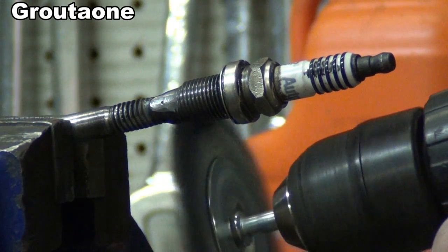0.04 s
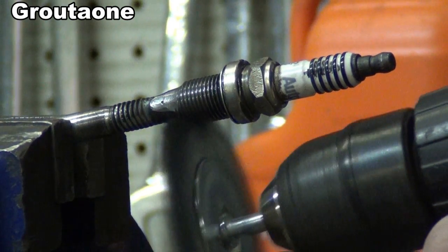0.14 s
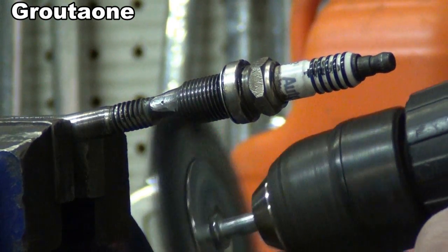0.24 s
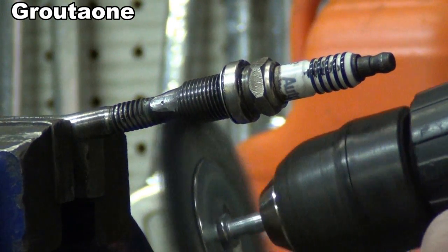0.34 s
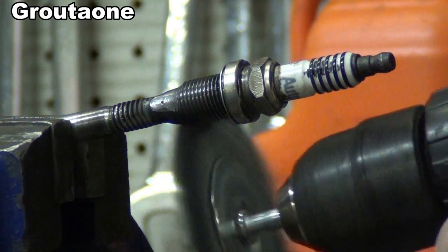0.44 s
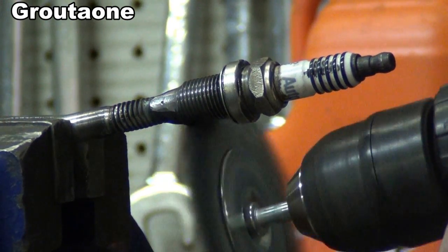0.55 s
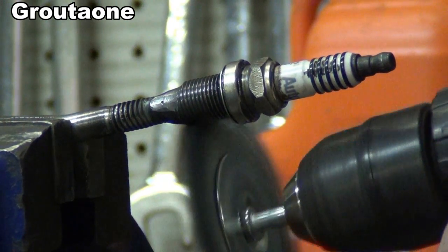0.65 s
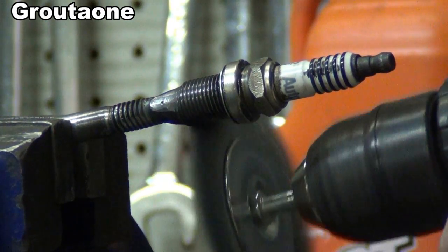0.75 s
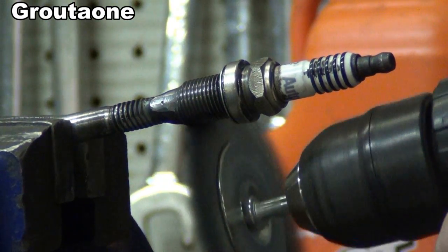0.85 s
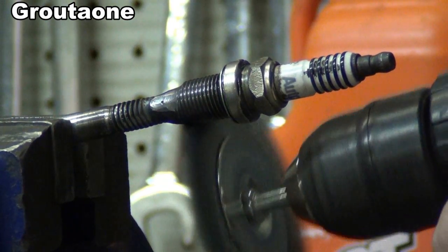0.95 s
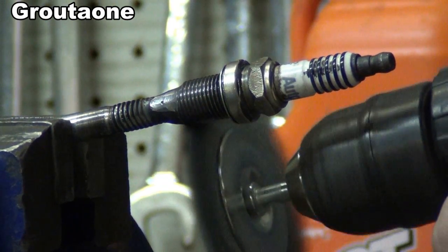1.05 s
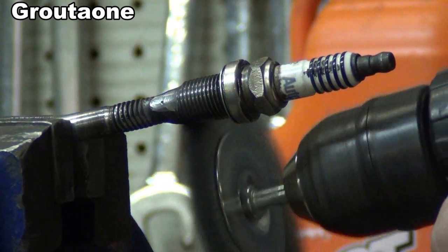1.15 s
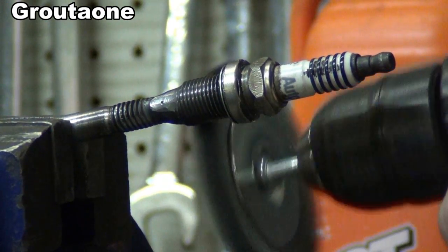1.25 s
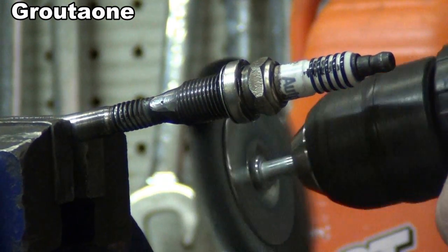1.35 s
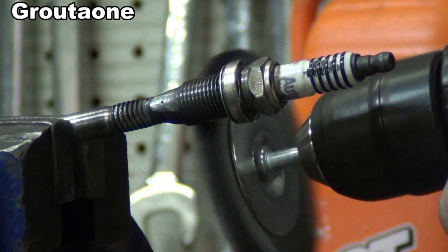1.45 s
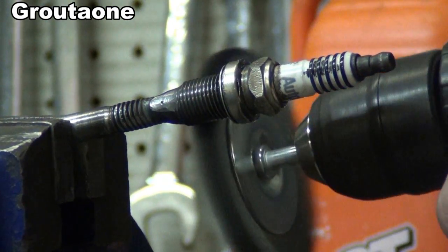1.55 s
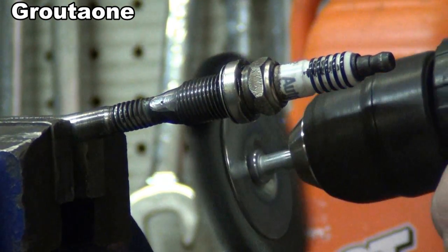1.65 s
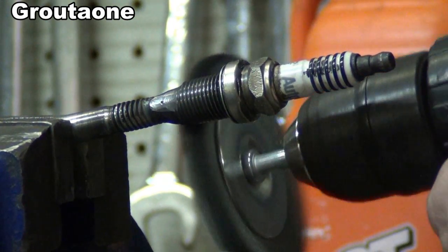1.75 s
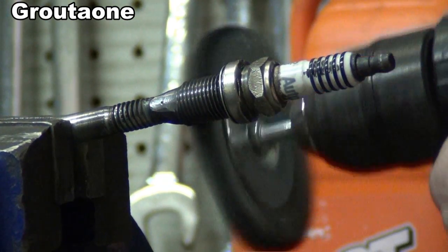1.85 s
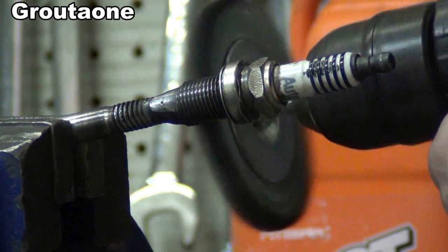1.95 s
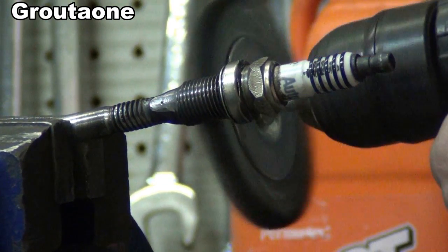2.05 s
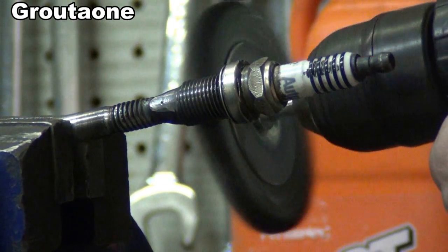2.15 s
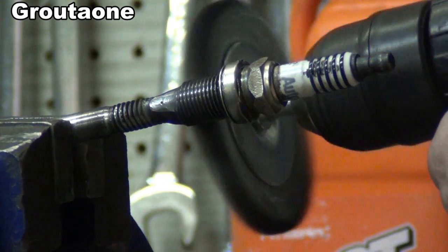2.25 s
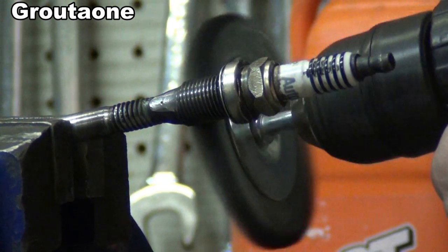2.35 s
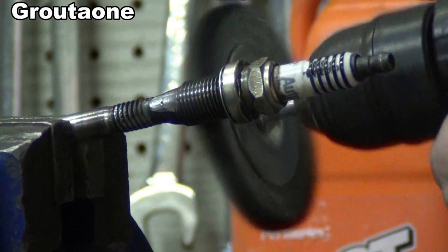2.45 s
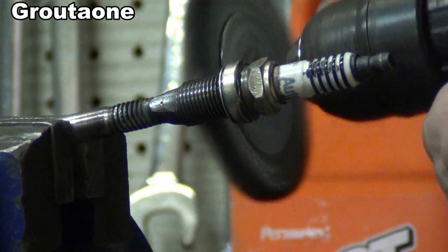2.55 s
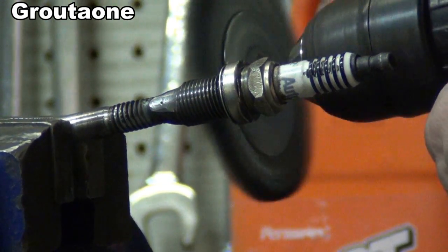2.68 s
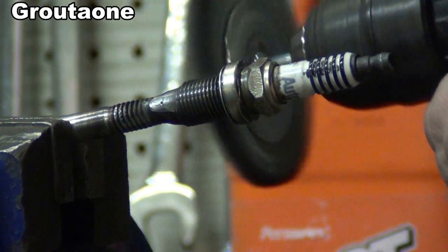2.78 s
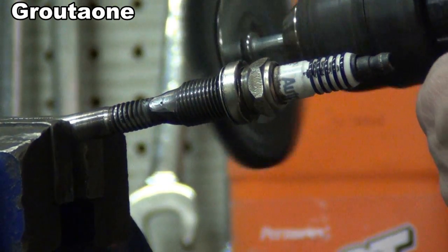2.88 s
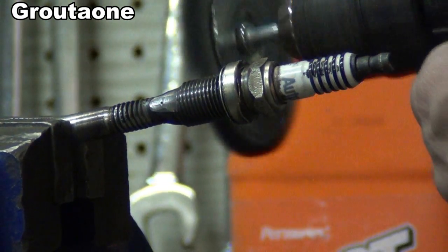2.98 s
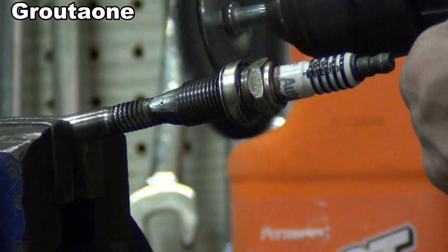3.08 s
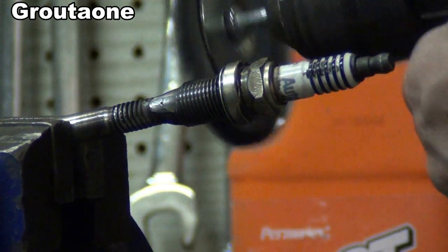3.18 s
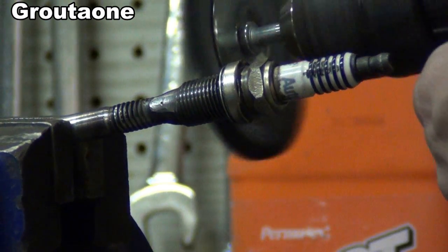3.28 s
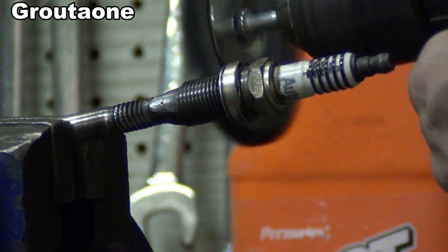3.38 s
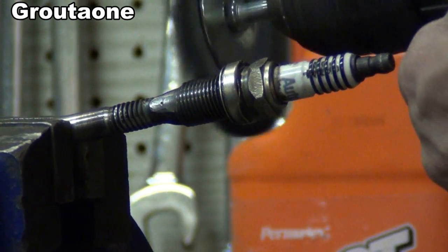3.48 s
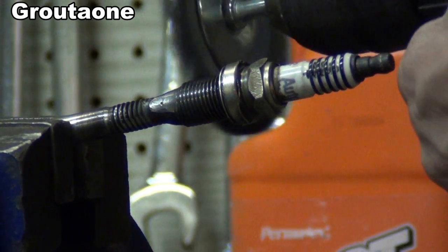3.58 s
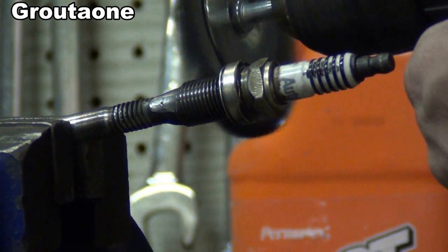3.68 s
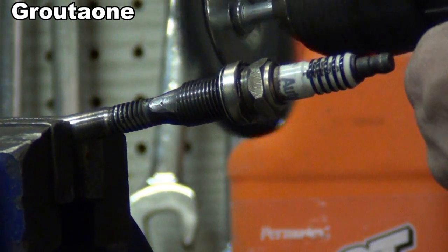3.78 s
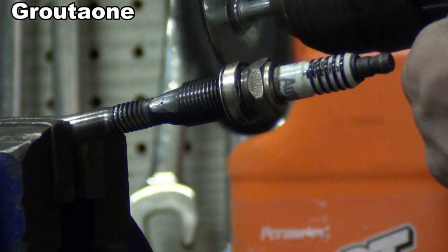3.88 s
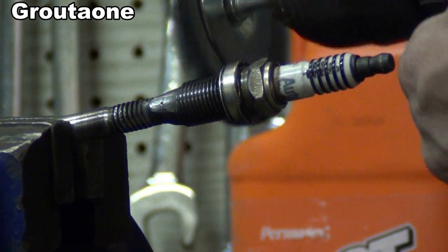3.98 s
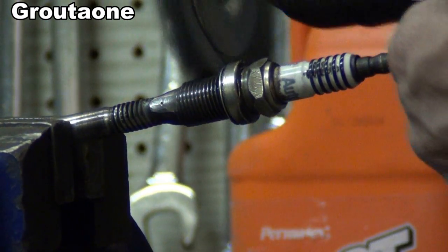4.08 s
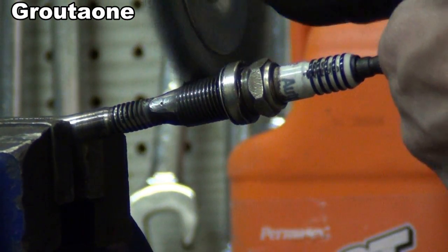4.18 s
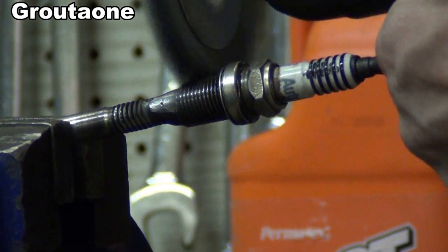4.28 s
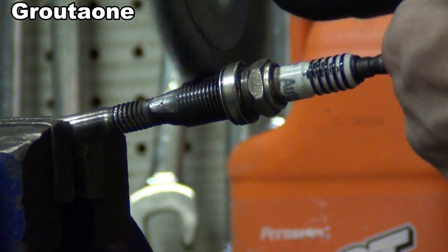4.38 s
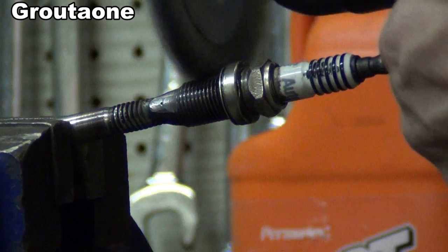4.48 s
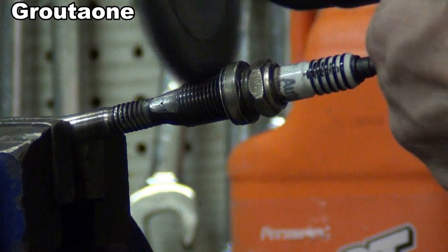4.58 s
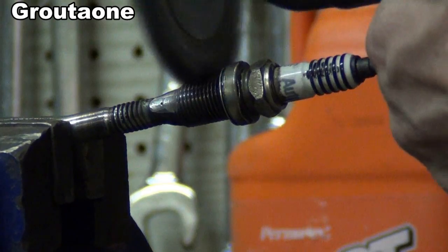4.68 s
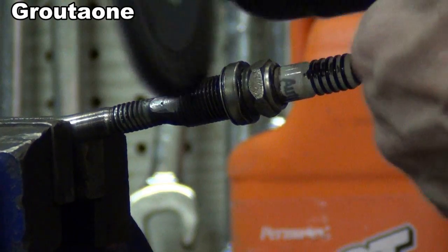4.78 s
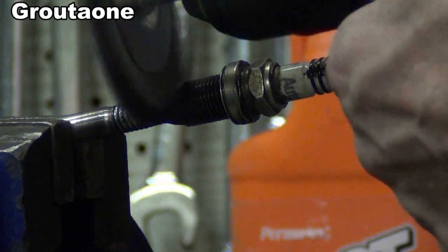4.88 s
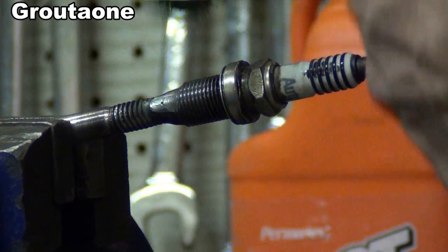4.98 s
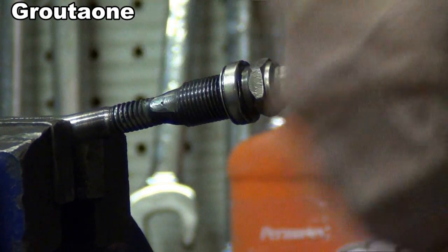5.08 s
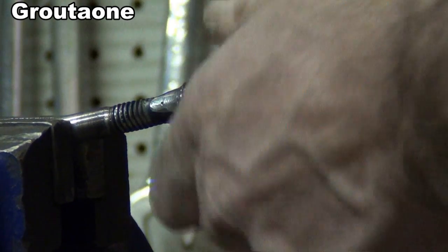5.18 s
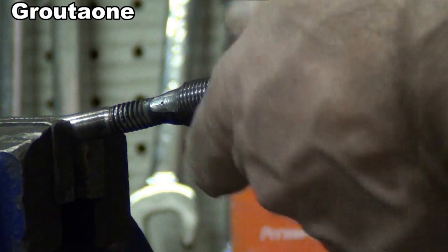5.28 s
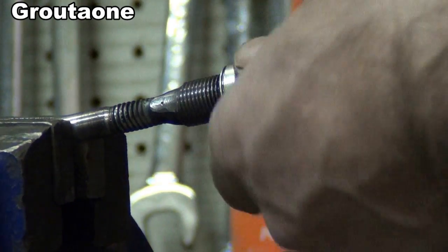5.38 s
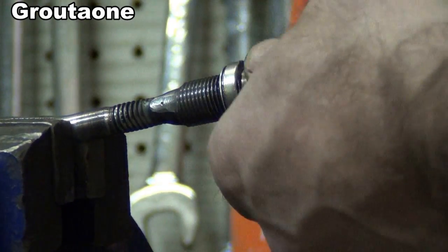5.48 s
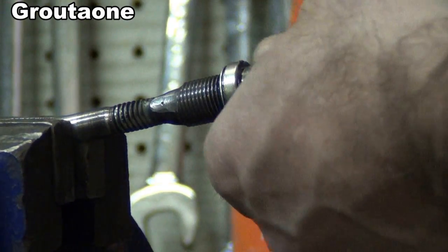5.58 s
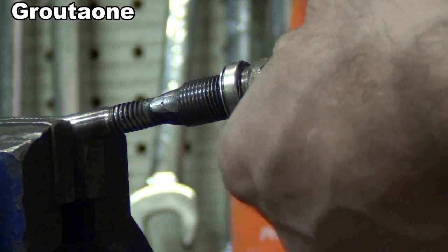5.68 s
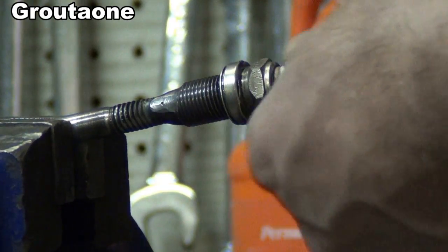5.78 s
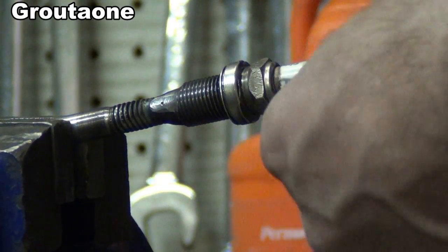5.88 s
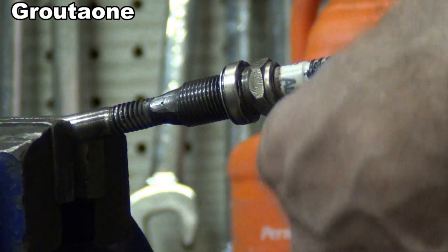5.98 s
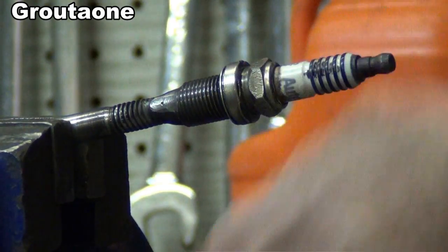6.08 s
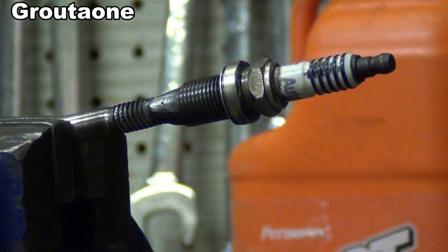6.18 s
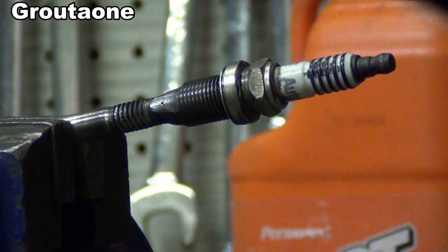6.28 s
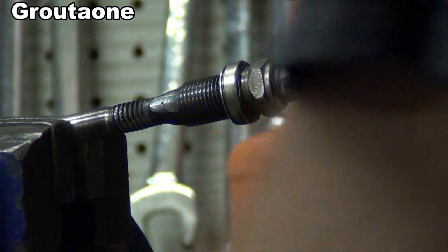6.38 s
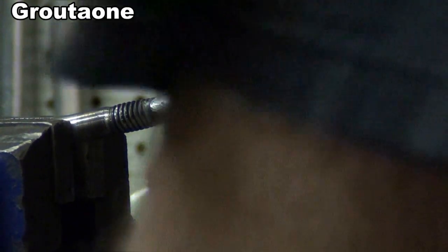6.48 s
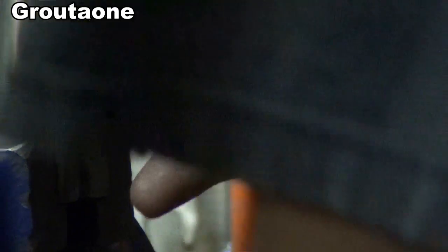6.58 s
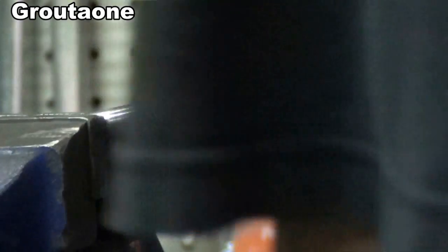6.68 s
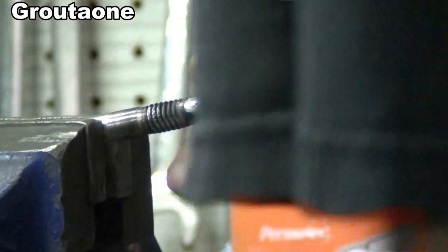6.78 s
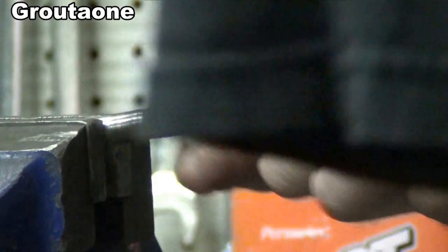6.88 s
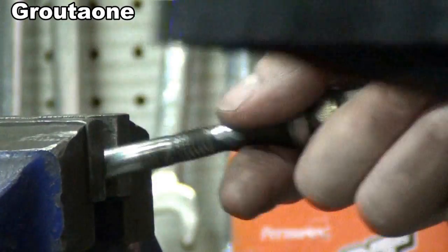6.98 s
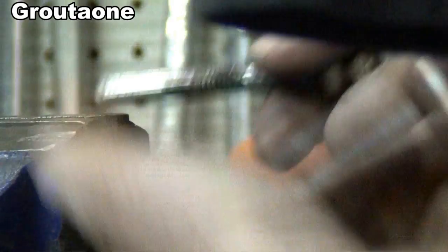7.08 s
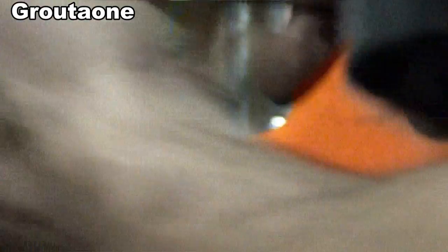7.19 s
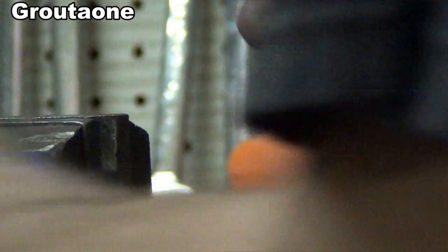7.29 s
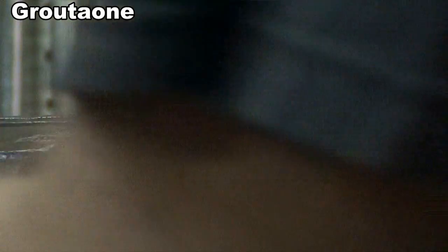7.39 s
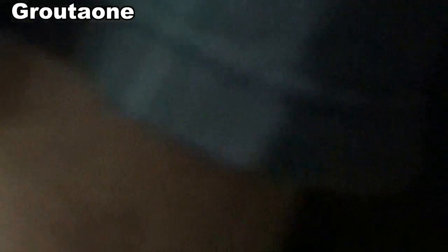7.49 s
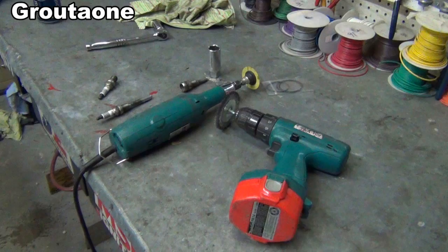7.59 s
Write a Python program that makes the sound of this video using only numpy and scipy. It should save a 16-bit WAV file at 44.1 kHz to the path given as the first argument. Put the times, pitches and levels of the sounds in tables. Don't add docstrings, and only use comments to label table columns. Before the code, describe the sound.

Near microphone, narrow stereo, short room echo. Loud continuous wire scratching and shrill drill whine fill about five seconds, pitch rising whenever pressure eases. Both stop sharply, leaving soft room hiss and faint motor ticking. Then come bouncing bench knocks, a light hand rustle, a bright steel-bar clank, scuffing metal and a deep thump, a small clink, and a harsh short squeak with dry snaps.

```python
import sys
import numpy as np
from scipy import signal
from scipy.fft import rfft, irfft
from scipy.io import wavfile

SR = 44100
rng = np.random.default_rng(int(sys.argv[2]) if len(sys.argv) > 2 else 0)


def natural_amplitude(level_db):
    exponent = np.asarray(level_db, float) / 20
    return 10 ** exponent


def wrap_up_sound(samples):
    columns = np.atleast_2d(samples).T
    tamed = np.clip(columns, -1, 1)
    steps = np.round(tamed * 32767).astype(np.int16)
    wavfile.write(sys.argv[1], SR, steps)


N = 336924
TIME = np.arange(N) / SR
TRIGGER_OFF_S = 4.99
SHAFT, WHEEL = .0313, .00263


def evened(x):
    return x / np.sqrt(np.mean(x ** 2) + 1e-20)


def over_time(table):
    s, *columns = np.transpose(table)
    return [np.interp(TIME, s, column) for column in columns]


def hiss():
    return rng.standard_normal(N)


def read(points, hz):
    f, value = np.transpose(points)
    return np.interp(np.log(hz + 1), np.log(f + 1), value)


def colour(x, points):
    level_db = np.maximum(read(points, abs(np.fft.fftfreq(8192, 1 / SR))), -100)
    log_gain = np.log(natural_amplitude(level_db))
    taps = np.fft.ifft(np.exp(np.conj(signal.hilbert(log_gain)))).real[:4096]
    return signal.oaconvolve(x, taps / np.linalg.norm(taps))[:len(x)]


def resonate(x, hz, width):
    turn = np.exp(2j * np.pi * np.cumsum(hz * np.ones(len(x))) / SR)
    r = np.exp(-np.pi * width / SR)
    return 2 * (turn * signal.lfilter([1 - r], [1, -r], x / turn)).real


def drift(hz):
    coarse = rng.standard_normal(N // 64 + 2)
    smooth = signal.sosfiltfilt(signal.butter(2, hz, fs=SR / 64, output="sos"), coarse)
    return np.interp(np.arange(N) / 64, np.arange(len(coarse)), evened(smooth))


def ring(modes, longest, rise):
    t, x = TIME[:SR // 2], 0
    for hz, db, t60 in modes:
        fade = natural_amplitude(db - 60 * t / min(t60, longest))
        for detune, phase in rng.uniform(-1, 1, (6, 2)):
            near_hz = hz + detune * (22 + .015 * hz)
            x = x + fade * np.sin(2 * np.pi * near_hz * t + phase)
    x = x * np.minimum(t / rise, 1)
    return x / np.linalg.norm(x)


def blows(hits, body, longest, rise):
    spectrum, modes = body
    bass, treble, clicks = np.zeros((3, N))
    for s, db, t60, ring_db, treble_db in hits:
        after = np.maximum(TIME - s, 0)
        length = max(t60, .002)
        burst = natural_amplitude(db - 6.5 - 60 * after / length)
        bass += burst * np.minimum(after / rise, 1)
        treble += burst * natural_amplitude(treble_db - 30 * after / length) * np.minimum(after / (0.23 * rise), 1)
        clicks[int(s * SR)] += natural_amplitude(db + ring_db + 21.0) * rng.choice([-1, 1])
    split = signal.butter(2, 4500, fs=SR, output="sos")
    noise = rng.standard_normal((2, N))
    dull = signal.sosfilt(split, noise)
    contact = colour(bass * dull[0] + treble * (noise[1] - dull[1]), spectrum)
    return contact + signal.oaconvolve(clicks, ring(modes, longest, 0.18 * rise))[:N]


LONGEST = dict(bench=.15, thump=.19, handle=.17, slide=.14, small=.12, vise=.08)

# f/Hz, t60/s
ROOM_RING = [(200, .62), (530, .56), (1390, .56), (3680, .46), (9700, .31)]


def tail(first):
    taps = np.zeros(SR)
    at = np.arange(first, SR - 20, 20)
    taps[at + rng.integers(0, 20, len(at))] = rng.choice([-1., 1.], len(at))
    hz, t, z = signal.stft(taps, SR, nperseg=256)
    dying = natural_amplitude(-60 * t / read(ROOM_RING, hz)[:, None])
    out = signal.istft(z * dying, SR, nperseg=256)[1]
    return out / np.linalg.norm(out)


# f/Hz, level/dB per Hz
AIR_COLOUR = [(20, -30), (60, 2), (150, 1.5), (400, -0.5), (620, -2.5), (900, 3.5), (1500, -2.5),
              (2500, -7), (6000, -12.5), (7500, -16.5), (10000, -14), (15500, -22), (16500, -50)]
AIR_DB = -43.5


def air(level_db):
    return natural_amplitude(level_db) * colour(hiss(), AIR_COLOUR)


# f/Hz, level/dB
MAINS_HUM = [(360.5, -55), (479.3, -53)]
# f/Hz, width/Hz, level/dB
FAN_TONES = [(807, 30, -57), (910, 35, -53)]
# t/s, level/dB
STAND_RUMBLE = [
    (0.0, -49),
    (2.04, -51.5),
    (6.64, -72),
    (6.87, -55),
    (7.64, -58),
]
# t/s, level/dB
MOTOR_TICK = [
    (5.2, -42),
    (5.65, -42),
    (6.1, -52),
    (7.64, -53),
]


def background():
    hum = sum(np.sqrt(2) * natural_amplitude(db + 0.65 * drift(hz=5.5)) * np.sin(2 * np.pi * hz * TIME)
              for hz, db in MAINS_HUM)
    fan = sum(natural_amplitude(db) * evened(resonate(resonate(hiss(), hz, width), hz, width))
              for hz, width, db in FAN_TONES)
    tick_phase = ((TIME - 5.345) * 29.9) % 1
    pulse = np.exp(-((tick_phase - .2) / .15) ** 2)
    tick_db, = over_time(MOTOR_TICK)
    tick = natural_amplitude(tick_db + 1.5 * drift(hz=12)) * pulse * np.sin(2 * np.pi * 1990 * TIME)
    rumble_db, = over_time(STAND_RUMBLE)
    rumble = natural_amplitude(rumble_db) * evened(resonate(resonate(hiss(), 41, 45), 41, 45))
    return air(AIR_DB + 0.16 * drift(hz=16)) + hum + fan + tick + rumble


# t/s, level/dB
RUB_STROKES = [
    [(5.86, -47), (5.93, -47), (6.0, -40), (6.06, -41.5), (6.1, -50), (6.15, -67)],
    [(7.45, -52), (7.53, -57), (7.58, -58)],
]
# f/Hz, level/dB per Hz
RUB_COLOUR = [(150, -11), (500, -3), (1230, -6), (1980, -5.5), (5420, -14), (6500, -13), (7500, -23),
              (10500, -11), (12500, -27), (16000, -28)]


def rustle():
    stroke = sum(natural_amplitude(np.interp(TIME, *np.transpose(rows), left=-99, right=-99)) for rows in RUB_STROKES)
    return stroke * natural_amplitude(4.0 + 2.5 * drift(hz=80)) * colour(hiss(), RUB_COLOUR)


# colour (f/Hz, level/dB per Hz), then modes (f/Hz, level/dB, t60/s).
TAP_BLOWS = [
    (5.9209, -10.5, 0.022, -22, -1),
    (5.9873, -25, 0.015, -16, -1.2),
    (6.999, -25, 0.011, -12, -6),
]
TAP_BODY = [(880, -39), (1500, -10), (2610, -23), (2860, -18), (4780, 1), (6560, -26), (10100, -4),
            (16000, -21)], [(4040, -11, .012), (5500, 10, 0.011), (10400, -5, .008)]
TICK_BLOWS = [
    (5.7312, -7, 0.01, -17, 0),
    (7.2024, -26, .008, -20, 0),
]
SMALL_TICK_BODY = [(800, -30), (4000, -22), (5600, -2), (7000, -16), (10200, -3), (12500, -8),
                   (16000, -14)], [(10300, 0, .012), (9300, -5, .01)]
RATTLE_BLOWS = [
    (6.939, -15, 0.04, -6, 3),
    (6.944, -24, .04, -2, 0),
    (6.955, -36, .02, 9, -6),
]
RATTLE_BODY = [(350, -30), (1200, -12), (1800, -3), (2800, -8), (4280, 0), (5260, -8), (7500, -16),
               (16000, -30)], [(2170, -3, 0.22), (1680, -6, .05), (4200, 0, .05), (5750, -6, 0.03),
               (9320, -6, .03), (12600, -14, .015)]
CLINK_BLOWS = [
    (7.0726, -10.5, 0.014, -2.5, 3),
    (7.082, -21, .015, 5, -8),
]
CLINK_BODY = [(880, -51), (1500, -11), (3090, -10), (4430, -16), (6110, -7), (7390, -19), (8600, -8),
              (11200, -14), (16500, -48)], [(2950, -11, 0.08), (5730, -9, .03), (6400, -6, .03),
              (8800, 3.5, 0.046), (10700, 0, 0.025)]


def small_knocks():
    small = LONGEST["small"]
    taps = blows(TAP_BLOWS, TAP_BODY, small, 0.0018)
    ticks = blows(TICK_BLOWS, SMALL_TICK_BODY, small, .001)
    rattle = blows(RATTLE_BLOWS, RATTLE_BODY, small, 0.0016)
    return taps + ticks + rattle + blows(CLINK_BLOWS, CLINK_BODY, small, .001)


BENCH_BLOWS = [
    (5.6562, -4, 0.095, -16.5, -3),
    (5.666, -11, .07, -16, -8),
    (5.674, -13, 0.07, -12, -6),
    (5.686, -6, 0.057, -16, 8),
    (5.697, -9, .06, -12, -10),
    (5.705, -6.5, 0.064, -13, -16),
    (5.722, -14, 0.056, -2, -10),
    (5.75, -11, 0.066, -18, 6),
    (5.767, -13, 0.074, -14, -16),
]
BENCH_BODY = [(29, -72), (60, -17), (110, -11), (193, -29), (264, 2), (321, -7), (408, -4.5), (842, -5),
              (2620, -15.5), (7210, -23.5), (10100, -21), (16000, -40)], [(263, 1, 0.14), (437, -9, 1.5),
              (875, -28, .3), (997, -7, 0.58), (1190, -22, 0.29)]


def bench_knocks():
    return blows(BENCH_BLOWS, BENCH_BODY, LONGEST["bench"], 0.002)


BAR_BLOWS = [
    (6.371, -5.5, 0.32, -8, 0.9),
    (6.384, -19, 0.33, 9, 1.2),
]
BAR_BODY = [(180, -71), (300, -37), (1060, -10), (1530, -9), (1800, -3.5), (3140, -11.5), (5930, -2.5),
            (8160, -10), (10100, 4.5), (15400, -15), (16500, -43)], [(1890, -24, 0.36), (2630, 2, 2.3),
            (3830, -5, 0.45), (4260, -8, 0.22), (5020, -8, 0.47), (5100, -17, 2.0), (5570, 12, 0.29),
            (8600, 3, 0.27), (9798, -8, 0.31), (9800, -3, 0.28), (10320, -10, 0.32)]


def handle_clank():
    return blows(BAR_BLOWS, BAR_BODY, LONGEST["handle"], 0.0075)


SLIP_BLOWS = [
    (6.6172, -33, .03, 16, -10),
    (6.6205, -34.5, .03, 17, -10),
    (6.6245, -32, .03, 18, -10),
    (6.6285, -43, .03, 12, -10),
]
SLIP_BODY = [(300, -40), (1600, -2), (4000, -6), (9000, -30)], [(830, -7.5, 0.14), (1640, -3, 0.087),
             (1960, -3, .05), (2700, -10, .1), (3840, -11, 0.065), (6300, -11, .04)]
SLIDE_BLOWS = [
    (6.6335, -7, 0.033, -2.5, 7),
    (6.641, -9.5, 0.038, -7, -15),
    (6.647, -9, 0.065, -10, -19),
    (6.659, -14, 0.1, -13, -20),
]
SLIDE_BODY = [(120, -8), (683, -4.5), (1210, -10), (1750, -6), (2600, -1.5), (5840, -8), (7200, -15),
              (8120, -27), (9580, -1), (16000, -67)], [ (885, -5, .2), (1130, -13, .15), (1572, -15, .15),
              (1900, -1, 0.11), (2900, -6, .19), (3190, -6, .2), (3640, -7, .2), (3900, -2, .12),
              (4800, -4, .08), (5394, -9, .15), (6000, -10, 0.12), (7100, -1, .03)]


def handle_slide():
    slips = blows(SLIP_BLOWS, SLIP_BODY, LONGEST["slide"], 0.0055)
    return slips + blows(SLIDE_BLOWS, SLIDE_BODY, LONGEST["slide"], 0.0035)


SCUFF_BLOWS = [
    (6.782, -40, .2, -25, 8),
    (6.794, -31, .1, -25, 6),
    (6.797, -24, .05, -14, 2),
    (6.802, -12, .05, -8, 2),
    (6.808, -15, .04, -4, -8),
    (6.8145, -5, .02, -2, -8),
    (6.823, -12, .04, -5, -6),
    (6.837, -17, .05, -6, -4),
]
SCUFF_BODY = [(300, -11), (900, -4), (2000, -12), (2700, -17), (4000, -14), (7500, -18), (10400, -6),
              (16000, -40)], [(1090, -7, 0.058), (1700, -3, 0.1), (1905, 6, 0.026), (2120, 2, 0.04),
              (2530, -2, 0.084), (3150, -22, .1)]
THUMP_BLOWS = [
    (6.8175, -1, 0.056, -10, -3),
    (6.8265, -2, 0.05, -3.5, -9),
    (6.839, -2, 0.083, -18, -13),
    (6.856, -12, 0.054, -11, -12),
    (6.873, -15, .08, -5, -12),
]
THUMP_BODY = [(15, -50), (25, -12), (53, -14), (170, -11), (300, -8), (489, -7), (900, -11.5),
              (2480, -23.5), (7510, -29), (16000, -54)], [(48.3, 2, 0.48), (248, 4, .3), (335, -11, .3),
              (422, -4, 0.26), (607, -14, 0.23), (980, -18, 0.25), (1314, -5, 0.26)]


def vise_thump():
    scuffs = blows(SCUFF_BLOWS, SCUFF_BODY, LONGEST["small"], 0.00054)
    return scuffs + blows(THUMP_BLOWS, THUMP_BODY, LONGEST["thump"], 0.0014)


SNAP_BLOWS = [
    (7.1222, -3, .012, -10, -12),
    (7.126, -13, 0.0092, -7, -12),
    (7.1305, -12, .012, -10, -12),
    (7.1335, -14, .01, 0, -12),
    (7.1375, -15.5, .012, 0, -12),
    (7.143, -14, .01, -19, -12),
    (7.1495, -10, .01, -18, -12),
    (7.1518, -11, .01, -23, -12),
    (7.156, -16, .012, -20, -12),
    (7.171, -17, .012, -20, -12),
]
SNAP_BODY = [(300, -25), (1000, -4), (2000, 0), (3800, -6), (6000, -14), (10000, -20), (14000, -40),
             (16000, -70)], [(9400, 1, .03), (7150, -8, .025), (3830, -12, 0.046)]


def thread_snaps():
    return blows(SNAP_BLOWS, SNAP_BODY, LONGEST["small"], 0.0024)


# t/s, level/dB, hardness of upper partials/dB
SCREW_SQUEAK = [
    (7.078, -31, -2),
    (7.094, -24.5, -2),
    (7.1, -12.5, -12),
    (7.118, -14, -1.5),
    (7.123, -17.5, 5.5),
    (7.14, -17.5, 4.5),
    (7.152, -15.5, -2.5),
    (7.165, -10, -11),
    (7.178, -49, -7),
]
SCREW_PARTIALS = [-16, -1.5, -6, -1, -4, -5, -9, -11, -13, -13, -16, -16]
# f/Hz, level/dB, t60/s
VISE_MODES = [(640, 0.5, .2), (926, 0, .1), (1198, 3.5, 0.12), (1570, -5.5, .06), (1720, 3, .15),
              (1858, 3, 0.1), (2155, 6, 0.086), (3000, -4, .1), (3700, -1, 0.11), (4240, -6, .1)]
# f/Hz, level/dB per Hz
SCRAPE_COLOUR = [(150, -33), (330, -31), (630, 9), (1000, -2.5), (1700, 3), (2400, 1), (4000, -13),
                 (9000, -27), (16000, -70)]
GRIT_COLOUR = [(1500, -31), (2500, -40), (4000, 6), (6500, -3), (8300, -23), (10500, -14), (13000, -28),
               (14500, -58)]
# f/Hz, width/Hz, level/dB
GRIT_SQUEAL = [(9550, 220, 17), (7090, 300, 15), (3750, 200, 5)]


def squeak():
    level_db, hard_db = over_time(SCREW_SQUEAK)
    on = (TIME > SCREW_SQUEAK[0][0]) * (TIME < SCREW_SQUEAK[-1][0])
    turns = np.cumsum(312 * (1 + .014 * drift(hz=60))) / SR
    slips = 0
    for k, db in enumerate(SCREW_PARTIALS, 1):
        waver_db = (1.5 if k == 2 else 4.0) * drift(hz=68.4)
        partial = np.cos(2 * np.pi * (k * turns + rng.random()))
        slips = slips + partial * natural_amplitude(db + (k > 2) * hard_db + waver_db)
    scrape = 0.98 * natural_amplitude(hard_db) * colour(hiss(), SCRAPE_COLOUR)
    drive = on * natural_amplitude(level_db) * (slips + scrape)
    grit_level = natural_amplitude(-42) + natural_amplitude(-21) * np.exp(-((TIME - 7.135) / 0.011) ** 2)
    grit = colour(on * grit_level * hiss(), GRIT_COLOUR)
    grit = grit + sum(natural_amplitude(db) * resonate(grit, hz, width) for hz, width, db in GRIT_SQUEAL)
    casting = signal.oaconvolve(drive, ring(VISE_MODES, LONGEST["vise"], 0.00034))[:N]
    return natural_amplitude(-1.5) * drive + natural_amplitude(-13) * casting + grit


BRAKE_BLOWS = [
    (5.015, -48, .03, 12, 0),
    (5.085, -36, .03, 17.4, 0.011),
]
BRAKE_BODY = [(300, -10), (1000, 0), (3000, -20)], [(599, 1, .15), (1180, -4, .1), (970, -3, 0.11)]


def brake():
    return blows(BRAKE_BLOWS, BRAKE_BODY, LONGEST["bench"], 0.063)


# f/Hz, width/Hz, level/dB
SHELL = [(2758, 71, 7.5), (4290, 360, 1.5), (5710, 880, 7), (1016, 210, 2), (373, 25.7, 12.5),
         (2923, 19, 2)]


def housing(x):
    driven = np.clip((TRIGGER_OFF_S + .02 - TIME) / .04, .25, 1)
    return x + driven * sum((natural_amplitude(db) - 1) * resonate(x, hz, width) for hz, width, db in SHELL)


# t/s, level/dB, top hiss minus level/dB
SCRATCH = [
    (0.0, -10.5, -5.5),
    (0.79, -11, -6),
    (2.51, -11, -8.5),
    (4.61, -11.5, -8.5),
    (4.97, -12.5, -5),
    (5.02, -17, -7.5),
    (5.105, -16, -9.5),
    (5.14, -21, -15),
    (5.18, -27.5, -20),
]
# f/Hz, level/dB per Hz
SCRATCH_LOW = [(30, -40), (204, -19), (431, -6.5), (507, -6), (672, -5), (1260, 2), (2430, -4),
               (2730, -2.5), (4260, 0.5), (5010, -6.5), (8000, -9.5), (10400, -34.5)]
SCRATCH_TOP = [(3820, -25.5), (6500, -12), (7280, -12), (9980, 0), (11000, 0), (12100, -8.5), (15400, -17),
               (16200, -59)]
# f/Hz, width/Hz, share
COASTING = [(4300, 600, -0.54), (1270, 250, -0.17), (5500, 1500, 0.8), (400, 280, 0.67)]


def brush(turns):
    level_db, top_db = over_time(SCRATCH)
    level_db = level_db - 350 * np.maximum(TIME - SCRATCH[-1][0], 0)
    wheel_db = 0.2 * np.sin(2 * np.pi * (WHEEL * turns + 0.5 * drift(hz=3.3)))
    shaft_db = 0.2 * np.sin(2 * np.pi * SHAFT * turns)
    wobble_db = wheel_db + shaft_db + 0.5 * drift(hz=30)
    strong_flicks = rng.exponential(1, N) * (rng.random(N) < 3000 / SR)
    flicks = rng.standard_normal((2, N)) * (1 + 0.86 * strong_flicks)
    low = housing(colour(flicks[0], SCRATCH_LOW))
    slack = np.clip((TIME - TRIGGER_OFF_S) / .03, 0, 1)
    low = low + slack * sum(share * resonate(low, hz, width) for hz, width, share in COASTING)
    top = colour(flicks[1], SCRATCH_TOP) * natural_amplitude(top_db + 1.0 * drift(hz=200) + 2.0)
    return natural_amplitude(level_db + wobble_db) * (natural_amplitude(-3.5) * evened(low) + top)


# t/s, f/Hz
PRESSED_PITCH = [(0.0, 3970), (0.13, 4085), (0.45, 4070), (1.1, 4010), (1.9, 3990), (2.75, 4025),
                 (3.1, 4110), (4.0, 4090), (4.45, 4090), (4.62, 4000), (4.72, 4080), (5.0, 4080)]
# start t/s, length/s, speed gain/%, sag time when pressed again/s
HAND_EASES = [
    (.47, .58, 4.6, .015),
    (.62, .13, 2.2, .03),
    (1.37, .36, 3, .03),
    (1.97, .28, 6.5, .08),
    (3.13, .14, 6.5, .05),
    (3.5, .23, 5.5, .015),
    (4.16, .27, 6.3, .05),
    (4.68, .16, 5.8, .1),
    (4.91, .2, 5.8, .1),
]


def mesh():
    gain = 0
    for s, length, percent, sag_s in HAND_EASES:
        run_up = 1 - np.exp(-np.clip(TIME - s, 0, length) / .045)
        sag = np.exp(-np.maximum(TIME - s - length, 0) / sag_s)
        gain = gain + percent * run_up * sag
    pressed_hz, = over_time(PRESSED_PITCH)
    return pressed_hz * (1 + gain / 100), gain


# t/s, grip on gearbox/0-1, vents facing microphone/0-1, lean toward vise/0-1
DRILL_HOLD = [(0, 0.9, 0.45, 0.8), (.44, 0.65, 0.3, 1), (.52, 0.7, 0.27, 0.5), (.98, 0.5, 0, 0.16),
              (1.08, 0.7, 0.5, 0.7), (1.35, 0.63, 0, 0.6), (1.45, 0.3, 0, 0.1), (1.88, 0.4, 0.1, 0.88),
              (2.08, 0, 0.58, 0.4), (2.45, 0.58, 0.4, 0.42), (2.95, 0.58, 0.5, 0.78),
              (3.13, 0.56, 0.37, 0.1), (3.2, 0.3, 0.05, 0.3), (3.3, 0.4, 0.47, 0), (3.8, 0.46, 0.24, 0),
              (4.12, 0.7, 0.38, 0.43), (4.35, 0.44, 0.22, 0.62), (5, 0.26, 0.47, 0.9)]
# t/s, load/0-1
SIDE_LOAD = [(0, 1), (1.1, 1), (1.3, .5), (2.3, .7), (2.5, 0), (3.1, .1), (3.3, .5), (3.8, .1), (4.15, .1),
             (4.3, .55), (5, .35)]
# multiple of mesh, level/dB at full grip, facing and lean,
# loss without grip/dB, without facing/dB, without lean/dB, change per % of run-up/dB
MESH_WHINE = (1.005, -12.5, 2, 4, 0, .1)
PLANET_GEARS = [(.308, -18.5, 0, 13, 0, .2), (.413, -20.5, 15, 0, 0, -.5), (.14, -28.5, 0, 0, 12, .4),
                (.107, -34.5, 0, 6, -7, -.6), (.4994, -28, 8, 0, 4, -1.2), (.7243, -24.5, 12, 0, 10, 0),
                (.3586, -35, 22, 6, -12, 0)]
# multiple of mesh, level/dB
WEAK_LINES = [(0.258, -42), (.535, -32.5), (0.666, -44.5), (1.499, -37), (1.561, -35.5)]
# shaft turns off the mesh, level/dB
WHINE_SIDEBANDS = [(-2, -18), (-1, -11), (0, .5), (1, -3), (2, -5), (3, -17)]


def gears():
    mesh_hz, run_up = mesh()
    grip, facing, lean = over_time(DRILL_HOLD)
    jitter = .003 * drift(hz=11.97) + .0012 * drift(hz=152.0)
    turns = np.cumsum(mesh_hz * (1 + jitter)) / SR
    wheel = 2 * np.pi * (WHEEL * turns + .15 * drift(hz=4))
    turns = turns + np.cumsum(mesh_hz * .004 * np.sin(wheel)) / SR
    sway, = over_time(SIDE_LOAD)
    strong = []
    for k, db, grip_db, away_db, lean_db, run_db in [MESH_WHINE, *PLANET_GEARS]:
        lost_db = grip_db * (1 - grip) + away_db * (1 - facing) + lean_db * (1 - lean)
        strong.append((k, db - lost_db + run_db * run_up))
    lines = strong[1:] + list(WEAK_LINES)
    for k, db in WHINE_SIDEBANDS:
        sway_loss_db = 9 * (1 - sway) if k else 3 * sway
        lines.append((MESH_WHINE[0] + k * SHAFT, strong[0][1] + db - 10.0 - sway_loss_db))
    whine = 0
    for k, db in lines:
        near_mesh = .9 < k < 1.2
        chuck = 1 + .38 * np.sin((1 + (.2 < k < .9)) * wheel + 2 * np.pi * rng.random())
        rough = near_mesh * .3 * drift(hz=45)
        flutter_db = (2.3 if near_mesh else 1.2) * drift(hz=40.7) + (k < .2) * drift(hz=7.1)
        line = np.sin(2 * np.pi * (k * turns + rng.random()) + rough)
        whine = whine + np.sqrt(2) * natural_amplitude(db + flutter_db) * chuck * line
    return turns, housing(whine) * np.clip((TRIGGER_OFF_S - TIME) / 0.011, 0, 1)


# f/Hz, side minus mid level/dB
STEREO_WIDTH = [(40, -10), (150, -19.5), (350, -14), (700, -23), (1500, -28), (3000, -21), (5000, -23),
                (5900, -12), (8500, -6), (11000, -25.5), (16000, -20)]
# f/Hz, left minus right level/dB
PORT_LEAN = [(60, 1.5), (130, 2.5), (290, 0.5), (640, 0.5), (1410, 0.45), (3100, 0), (6820, -1),
             (15000, 1.5)]


def stereo_side(mid):
    spread = signal.fftconvolve(mid, tail(first=0)[:9000])[:N]
    hz = np.fft.rfftfreq(N, 1 / SR)
    reflections = rfft(spread) * natural_amplitude(read(STEREO_WIDTH, hz))
    leaning = rfft(mid) * np.tanh(read(PORT_LEAN, hz) * np.log(10) / 40)
    bass = signal.sosfilt(signal.butter(1, 70, fs=SR, output="sos"), mid)
    return irfft(reflections + leaning, N) + .02 * bass


def scene():
    turns, whine = gears()
    scratch = brush(turns)
    bench, handle = bench_knocks(), handle_clank()
    vise = small_knocks() + handle_slide() + vise_thump() + thread_snaps() + brake() + squeak() + rustle()
    hands = bench + handle + vise
    to_room = natural_amplitude(-14) * whine + natural_amplitude(-11.0) * scratch + natural_amplitude(-5.0) * hands
    wet = signal.fftconvolve(to_room, tail(first=100))[:N]
    mid = natural_amplitude(-1.0) * whine + natural_amplitude(-1.5) * scratch + hands + wet + background()
    side = stereo_side(mid) + .04 * vise - .1 * handle - .16 * resonate(whine, 4100, 900)
    side = side + air(AIR_DB - 13.5)
    return np.array([mid + side, mid - side])


def band_limit(x):
    return signal.sosfilt(signal.butter(12, 16990, fs=SR, output="sos"), x)


def record(dry):
    heard = signal.sosfilt(signal.butter(3, 42, "high", fs=SR, output="sos"), dry)
    limited = 1.228 * np.tanh(heard / 1.402)
    edge = signal.firwin(511, 15950, window=("kaiser", 8), fs=SR)
    mix = signal.oaconvolve(limited, edge[None], "same")
    return band_limit(mix)


dry = scene()
out = record(dry)
wrap_up_sound(out)
```